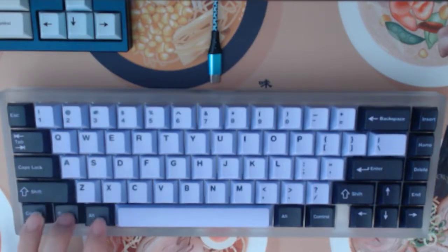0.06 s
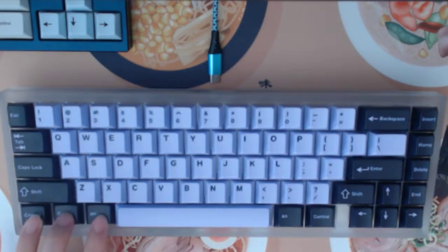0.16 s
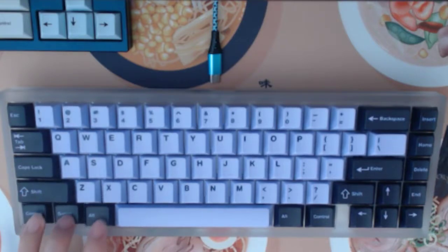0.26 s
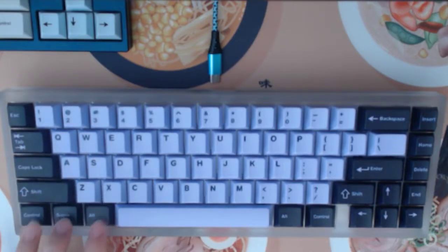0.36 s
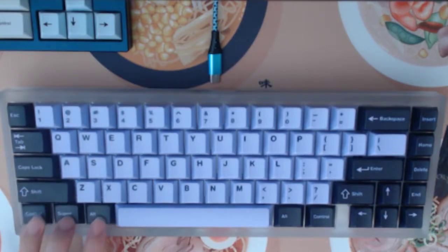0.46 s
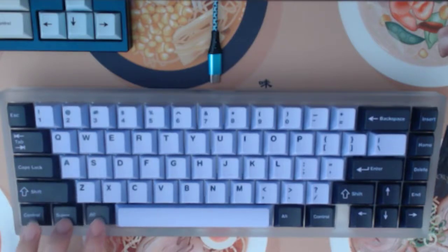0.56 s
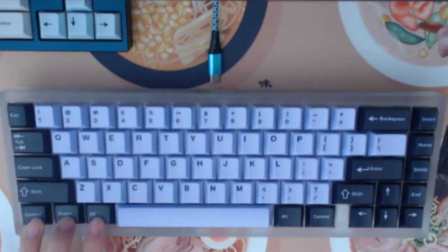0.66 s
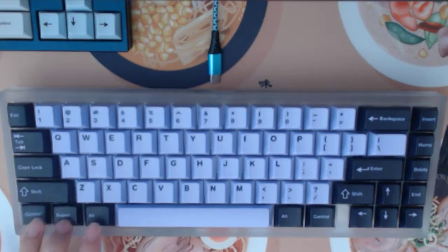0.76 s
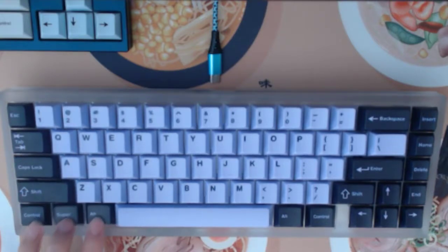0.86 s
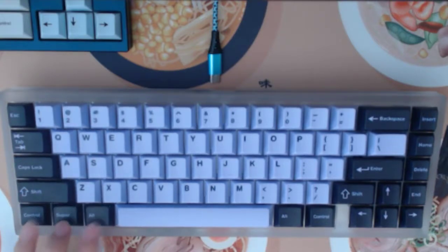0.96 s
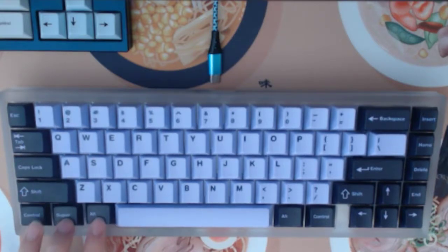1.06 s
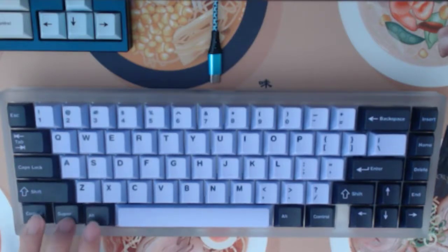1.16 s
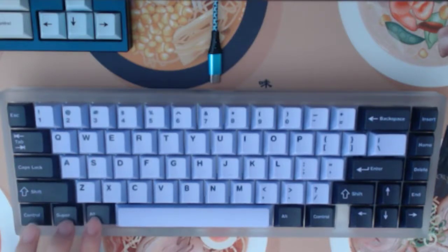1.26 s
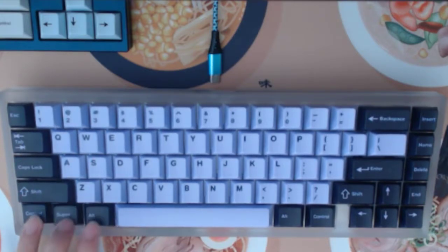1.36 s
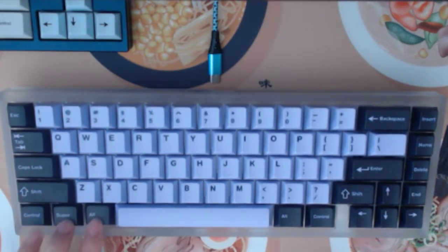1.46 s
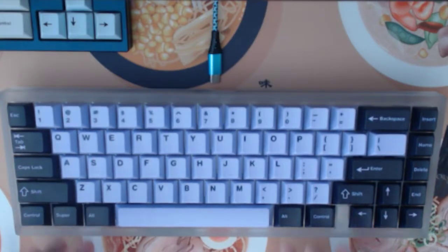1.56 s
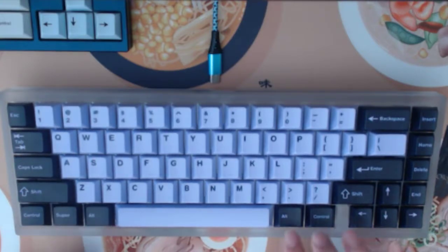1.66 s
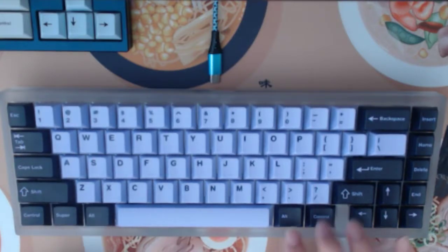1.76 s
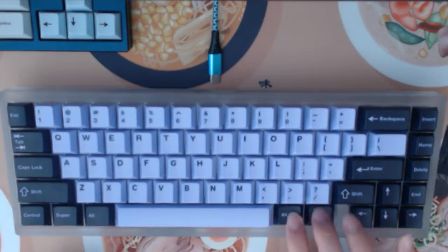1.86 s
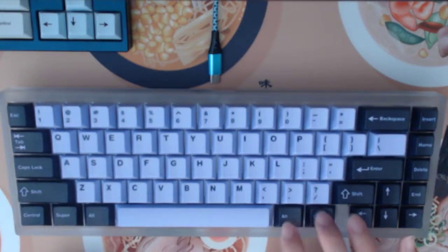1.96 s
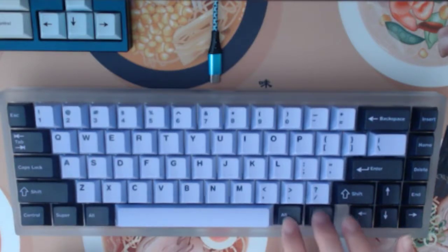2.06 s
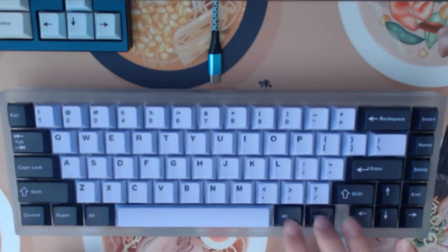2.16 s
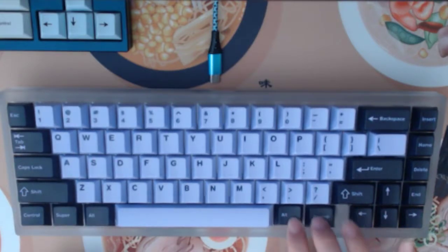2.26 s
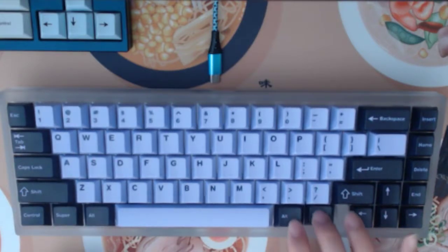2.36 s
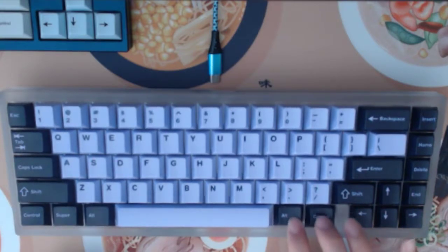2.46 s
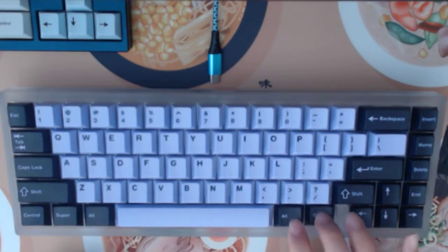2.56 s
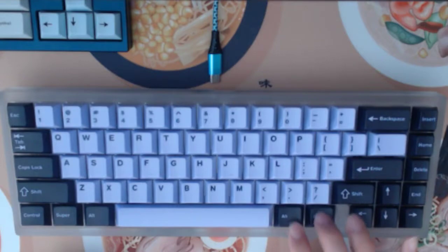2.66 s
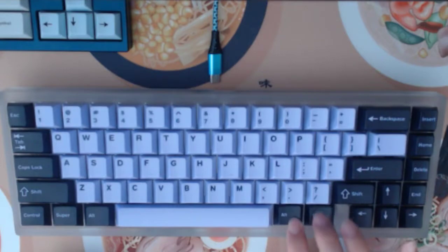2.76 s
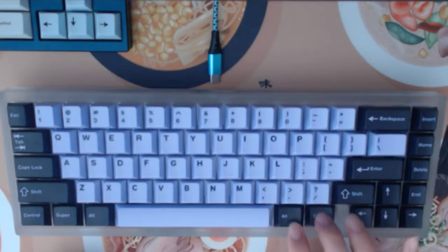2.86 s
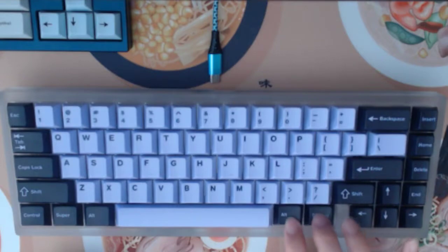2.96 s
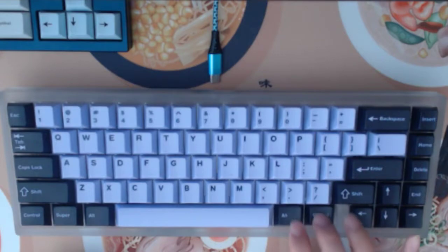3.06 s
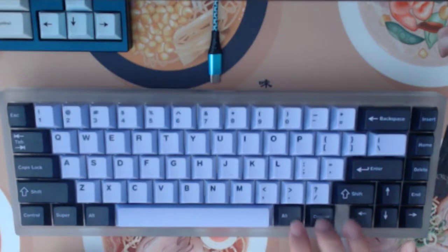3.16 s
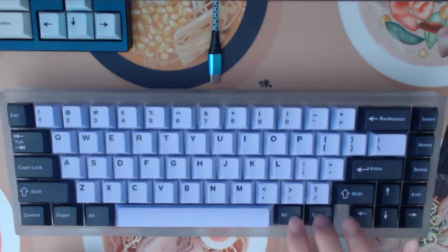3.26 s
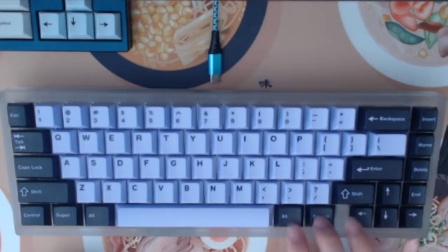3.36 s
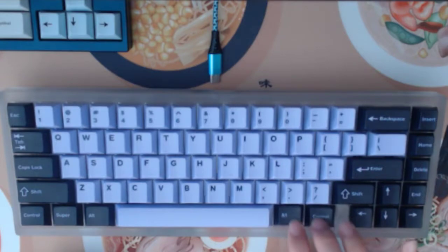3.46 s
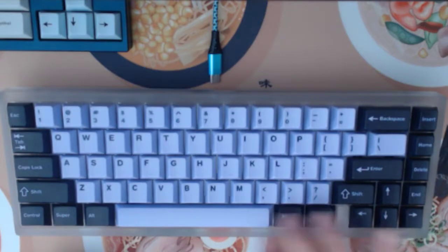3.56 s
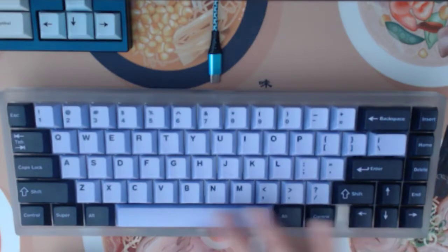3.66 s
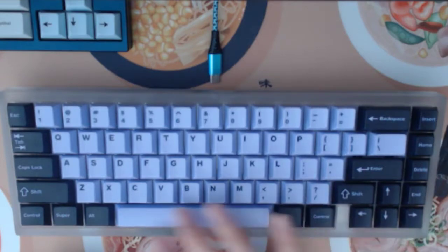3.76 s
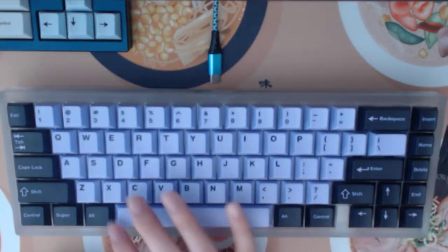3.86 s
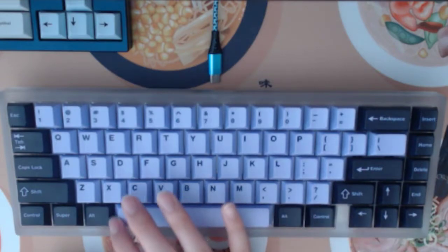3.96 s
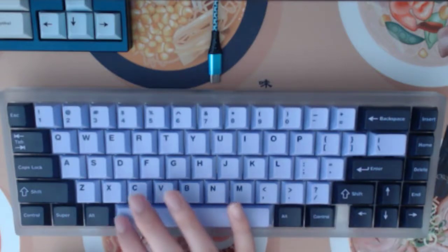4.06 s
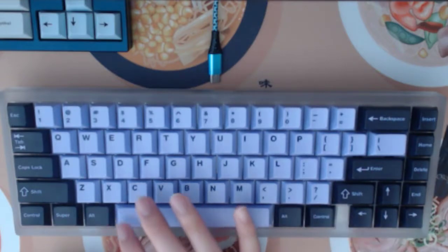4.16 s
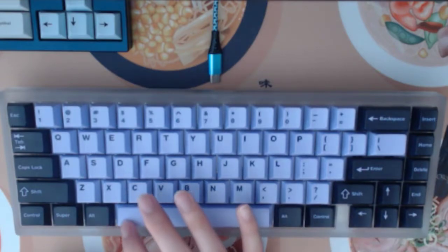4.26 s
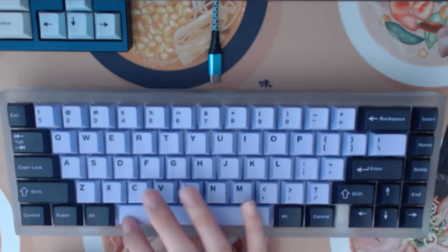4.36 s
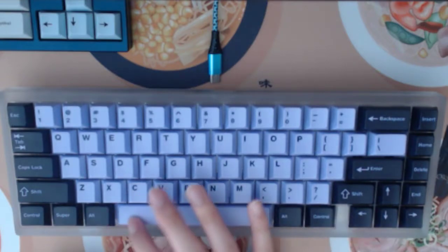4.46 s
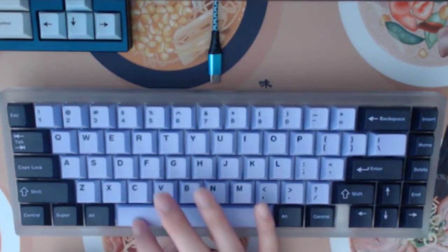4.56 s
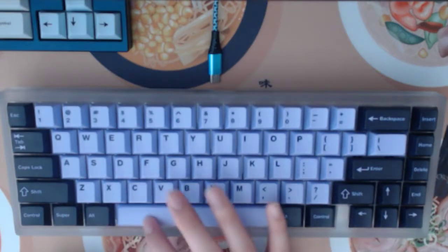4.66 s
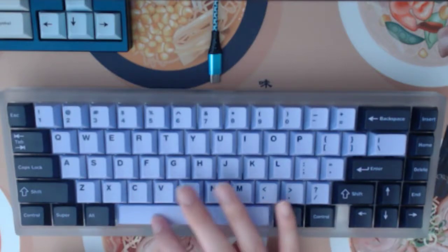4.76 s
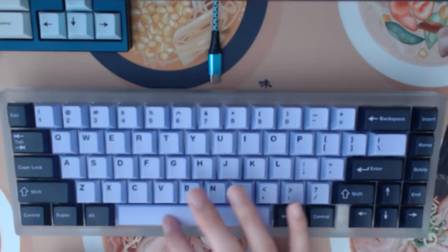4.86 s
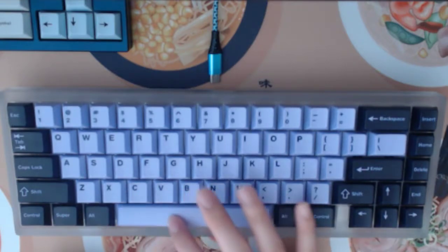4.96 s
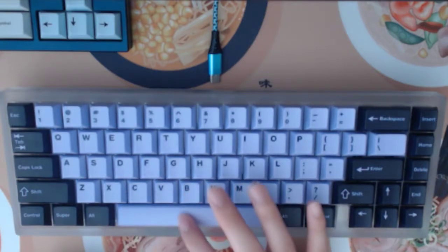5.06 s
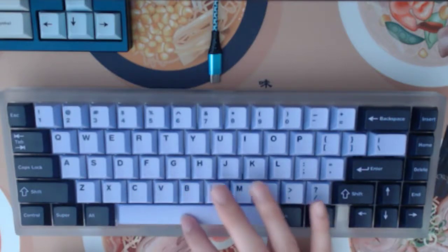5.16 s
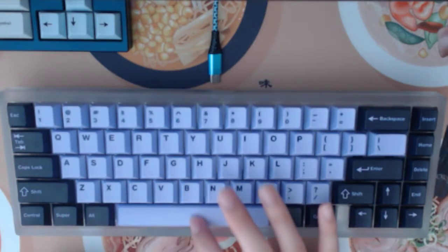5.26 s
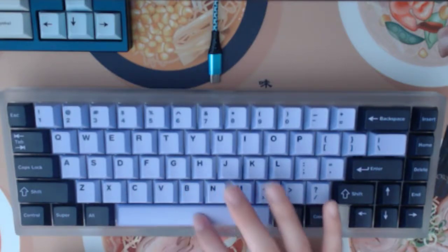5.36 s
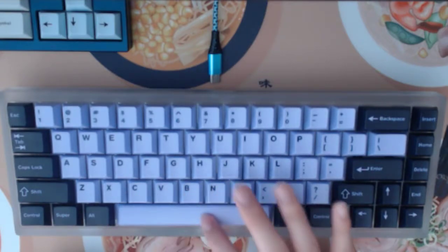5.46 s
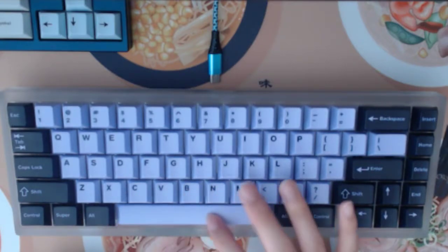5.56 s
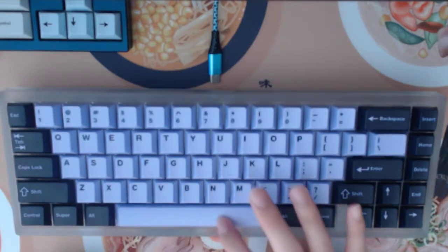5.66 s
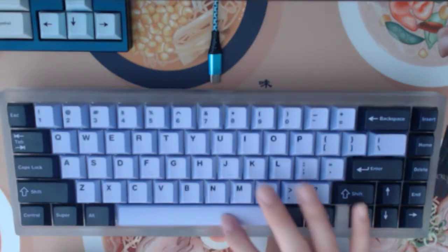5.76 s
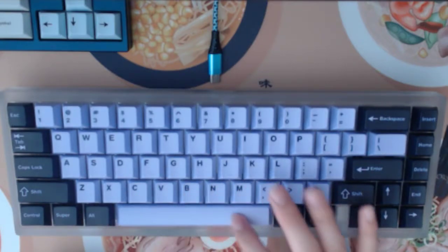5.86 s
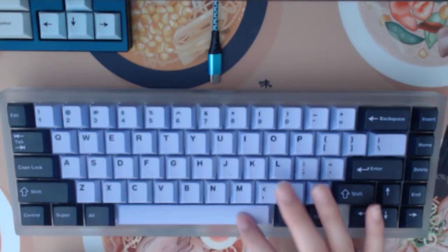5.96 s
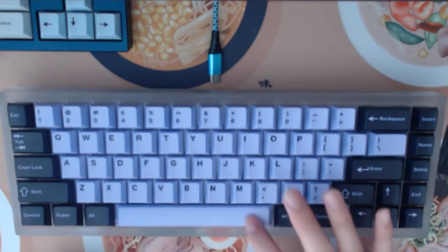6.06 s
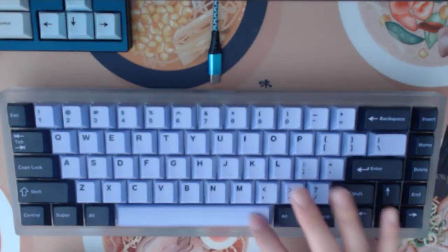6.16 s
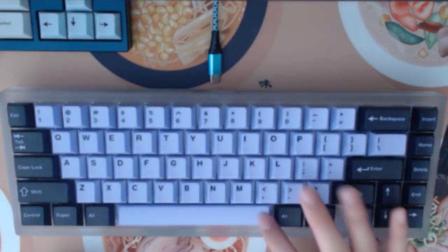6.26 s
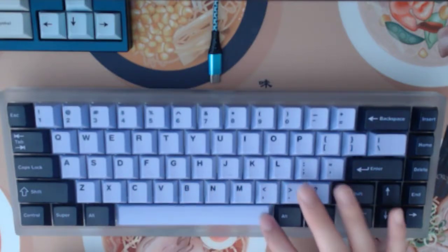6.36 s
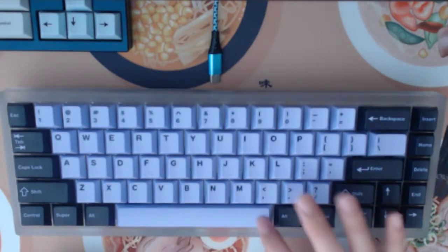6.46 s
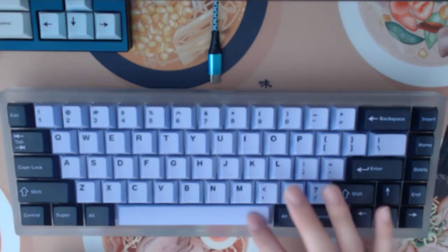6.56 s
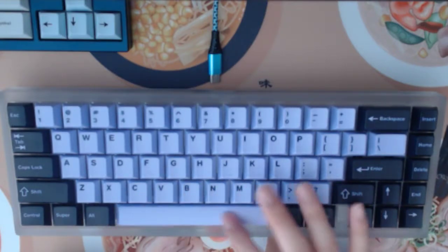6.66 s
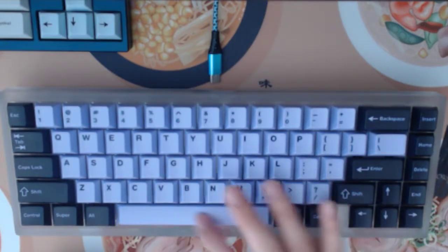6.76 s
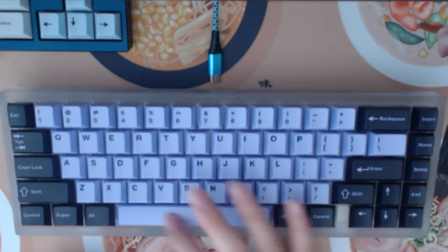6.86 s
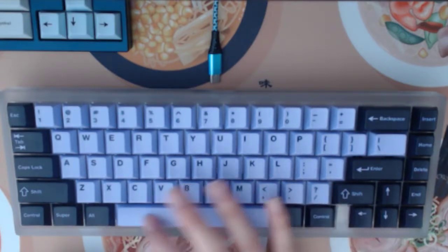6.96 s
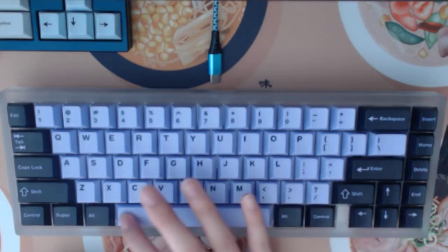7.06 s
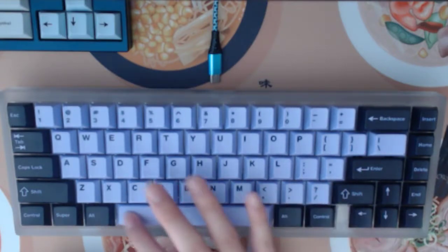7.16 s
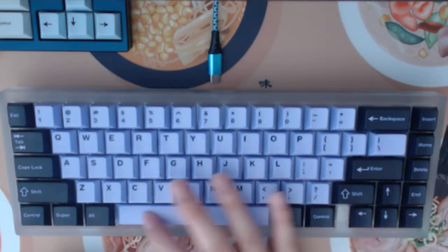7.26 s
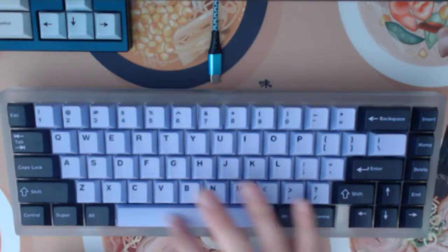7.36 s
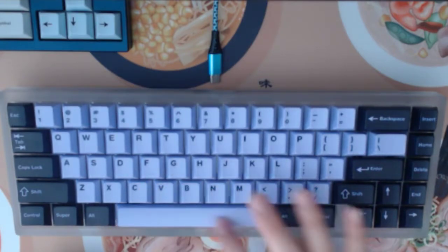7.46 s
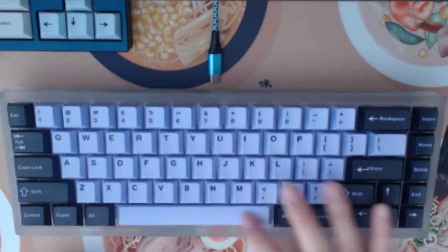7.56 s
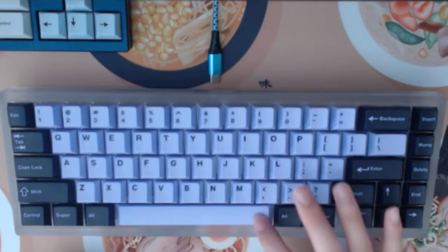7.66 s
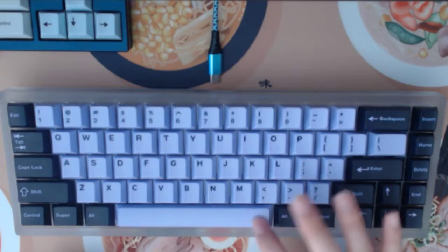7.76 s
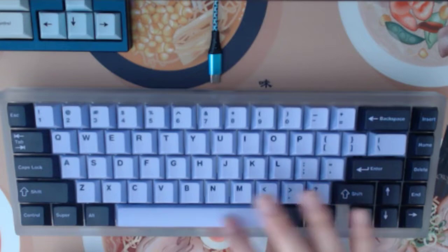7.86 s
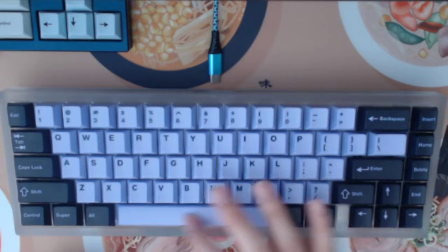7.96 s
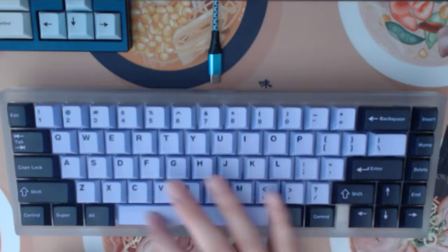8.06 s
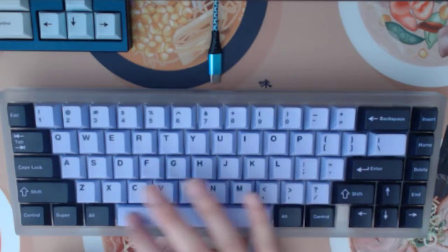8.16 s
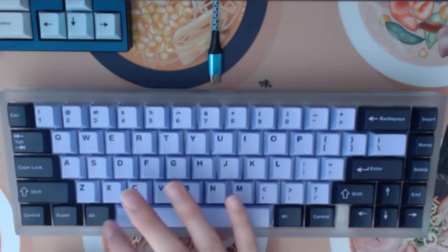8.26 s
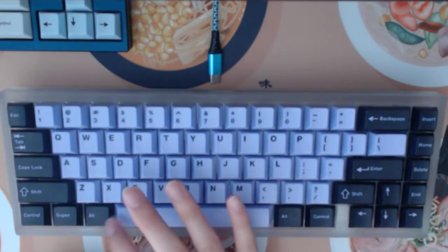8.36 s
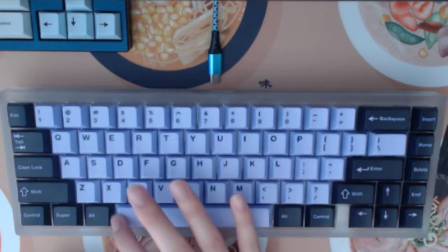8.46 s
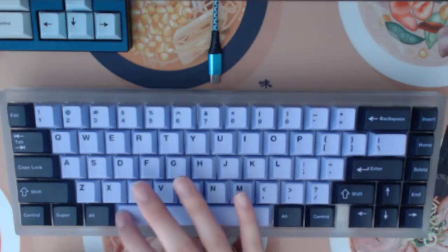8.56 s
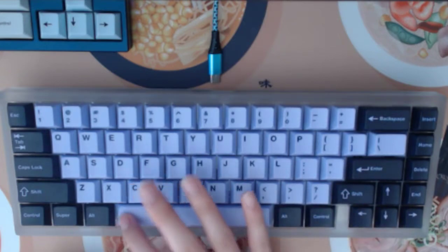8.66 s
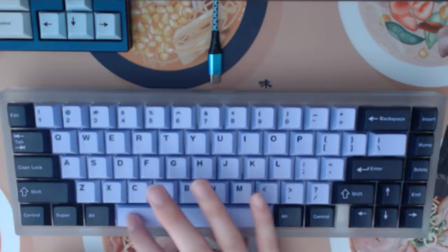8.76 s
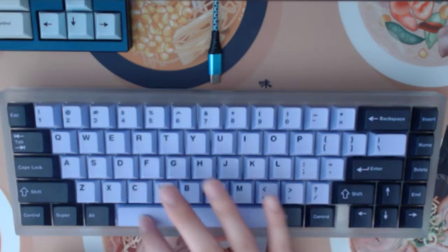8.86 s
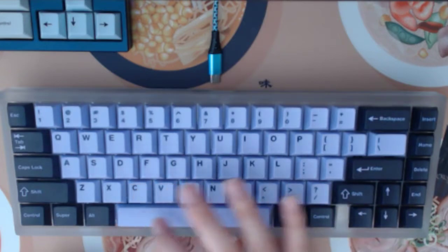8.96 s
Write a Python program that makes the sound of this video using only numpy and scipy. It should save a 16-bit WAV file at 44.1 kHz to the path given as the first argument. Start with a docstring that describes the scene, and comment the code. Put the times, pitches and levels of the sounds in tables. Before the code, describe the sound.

Close on a mechanical keyboard on a desk, small modifier keys are tapped in quick pairs, each a dry plastic clack with a softer release. After a faint finger brush and dull hand touch, fuller paired knocks follow. A short gap, then the space bar is struck steadily about seven times a second, rounder and woodier. Small room, short reflections, faint low hum.

```python
"""Fingers tap the bottom row of a mechanical keyboard on a desk, over a steady low hum of room air.
The ring of an earlier release opens it, then the small left keys come, mostly in quick pairs.
At about 1.5 s fingers brush the caps and the hand lands with dull puffs; then come the right keys, then the space bar.
Each press, release and light tick is a plastic knock: damped cap modes plus noise clatter, a thump
of desk modes, early wall echoes and a short noise tail for the room."""
import sys
import numpy as np
from scipy import signal
from scipy.fft import rfft, irfft, next_fast_len
from scipy.io import wavfile
from scipy.ndimage import uniform_filter1d

SR = 44100
rng = np.random.default_rng(int(sys.argv[2]) if len(sys.argv) > 2 else 0)


def elevation(decibels):
    """Turn decibel levels (scalar or array-like) into linear amplitude ratios."""
    levels = np.asarray(decibels, float)
    return 10 ** (levels / 20)


def to_wav(sig):
    """Store sig (one row per channel, or 1-D mono) as 16-bit WAV at the path in sys.argv[1].

    Samples outside -1..1 are clipped; the rate is SR.
    """
    pcm = np.clip(np.atleast_2d(sig), -1, 1) * 32767
    pcm = np.round(pcm).astype(np.int16)
    wavfile.write(sys.argv[1], SR, pcm.T)  # frames by channels


N = 397341

# Nominal ringing modes of each part of the row: pitch_hz, level_db (relative), t60_s
LEFT_MODES = [(908, -27, 0.017), (1320, 6, 0.011), (1665, 8, 0.0078), (2100, 8, 0.0087), (2603, 0.5, 0.017),
              (3173, 8.5, 0.0051), (4005, 6, 0.0076), (4830, -9.5, 0.0064), (5030, -10, 0.0086),
              (6330, -4.5, 0.004), (7390, -9.5, 0.014), (8620, -0.5, 0.0051), (10800, -5.5, 0.0067),
              (13000, -33, 0.0079)]
RIGHT_MODES = [(770, -13, 0.037), (1240, 10.5, 0.0099), (1860, 3, 0.0095), (2400, 7.5, 0.011),
               (2720, 6.5, 0.013), (3283, 7, 0.011), (3620, -0.5, 0.01), (4450, -3.5, 0.0027),
               (6600, -10.5, 0.0095), (7240, -10.5, 0.016), (8650, 1.5, 0.0041), (9420, -16, 0.014),
               (10600, -14, 0.0068), (13000, -28, 0.002)]
SPACE_MODES = [(646, -2.5, 0.025), (1083, 3, 0.013), (1450.2, -1.5, 0.0065), (1584, 2.5, 0.008),
               (1931, 1.5, 0.0084), (2500, 7, 0.0053), (2836, -3, 0.028), (3169, -8.5, 0.027),
               (3970, -8, 0.0058), (4660, -12.5, 0.011), (5094, -12.5, 0.013), (6270, -11, 0.0055),
               (6740, -17, 0.0077), (7420, -2.5, 0.0099), (8210, -1, 0.0084), (9140, 2.5, 0.0038),
               (10720, -5, 0.0077), (11300, -11.5, 0.02), (12870, 0, 0.0046)]
# When the hand moves to the next part of the row: start_s
HAND_MOVES = [1.6, 3.7]
# Edges of the case, cap, stem and tick ranges: edge_hz
RANGE_EDGES = [400, 1450, 4200, 7000, 16500]
# Nominal desk modes: pitch_hz, t60_s, then left_db, right_db, space_db (against the cap peak)
DESK_MODES = [(69.7, 0.28, -29, -42, -35.5), (101, 0.17, -30, -40.5, -32.5), (173, .22, -44.5, -38, -34.5),
              (160, 0.03, -56, -16, -34.5), (264.2, 0.29, -43.5, -47.5, -33.5),
              (361, 0.11, -41, -42, -38.5), (405, 0.028, -27, -46, -20)]
# Early wall echoes, before absorption: delay_s, level_db
WALL_ECHOES = [(.0068, -21), (.011, -22.5), (0.022, -24), (0.0254, -24), (.046, -36.5)]
# Decay of the room tail: frequency_hz, t60_s
ROOM_DECAY = [(300, 0.22), (1000, 0.43), (3000, 0.32), (8000, 0.37), (15000, 0.47)]
# Colour of the reflected sound: frequency_hz, level_db
ABSORPTION = [(400, -2.5), (1500, -1), (4000, -5.5), (9000, -10.5), (15000, -4)]
# Colour of the room air: frequency_hz, density_db (per Hz, relative)
AIR_COLOUR = [(15, -51), (25, -4), (70, -4.5), (108, 0), (146, -3.5), (177, -3), (304, -7), (389, -11),
              (445, -17.5), (1010, -25), (4860, -41.5), (14800, -49), (16500, -56)]
# Swell of each hand touch: level_db, t60_s
TOUCH_SWELLS = [(-44, .04), (-50, 0.06)]
# Unpitched clatter, rows case, cap, stem, tick: level_db (against the modes), t60_s
CLATTER = [(-12, 0.068), (-12, 0.003), (-4, 0.005), (-2.5, 0.011)]
# When a hand touches down on the desk: start_s
TOUCHDOWNS = [1.668, 1.684]
# Level path of fingers brushing over the caps: time_s, level_db
BRUSH_LEVEL = [(1.5, -71), (1.545, -62), (1.6, -64), (1.64, -74), (1.74, -87.5)]
# Keys hitting bottom: start_s, cap_peak_db, crispness_db (added to stem and tick)
KEY_PRESSES = [(0.0278, -17.5, 2), (0.0923, -17, -0.5), (0.2087, -15.5, 1.5), (0.2695, -18, -0.5),
               (0.3819, -14, 1), (0.4408, -17, 0), (0.562, -15.5, 1), (0.6222, -18.5, -2.5),
               (0.755, -15, 0.5), (0.8127, -17, 0), (0.9474, -17, 0), (1.0023, -16, 1), (1.1248, -13.5, 0),
               (1.1849, -16, 1.5), (1.3005, -13.5, 2), (1.3617, -15.5, -0.5), (1.7556, -13.5, -1),
               (1.8025, -16.5, -1.5), (1.9738, -12.5, 1.5), (2.0183, -14, -1), (2.146, -10.5, 0.5),
               (2.1892, -16, -1.5), (2.3261, -13, 1.5), (2.3723, -16, 0.5), (2.5077, -15, -1),
               (2.5327, -16, -1), (2.6709, -9, -3), (2.7042, -14.5, 0.5), (2.8567, -16, 2),
               (2.8799, -13.5, 0), (3.018, -13.5, 0.5), (3.0541, -14, -1), (3.1926, -16.5, 0.5),
               (3.2169, -16.5, -1.5), (3.3432, -19.5, -0.5), (3.3752, -13.5, 0), (3.8669, -25, 0.5),
               (4.1676, -11, -0.5), (4.3153, -14.5, 1), (4.4438, -11.5, 0.5), (4.5876, -13.5, 1),
               (4.7209, -14.5, 1), (4.8495, -16, 2.5), (4.9817, -15, 1), (5.1147, -12, -1),
               (5.257, -11, -1), (5.3914, -10.5, -0.5), (5.5343, -13.5, 0.5), (5.661, -15, 1),
               (5.7976, -13, -2), (5.926, -14, 0), (6.0581, -11.5, -0.5), (6.1965, -10.5, 0.5),
               (6.339, -10, 0), (6.4818, -14, -3), (6.6025, -14, -0.5), (6.7368, -15.5, -1.5),
               (6.85, -15, 1), (6.979, -15.5, 2), (7.0948, -12.5, 1.5), (7.2277, -13, 0), (7.3656, -10, -1),
               (7.5119, -13.5, -2), (7.633, -16.5, -3), (7.7499, -11, -0.5), (7.894, -13.5, 0),
               (8.0395, -17, 2.5), (8.1389, -12.5, 2), (8.3821, -16, -1), (8.51, -11, 2.5),
               (8.6512, -11.5, 3), (8.774, -10.5, 1.5)]
# Keys springing back to the top: start_s, cap_peak_db, crispness_db (added to stem and tick)
KEY_RELEASES = [(0.1418, -34, -3), (0.1644, -26, -4), (0.3396, -22.5, -1), (0.5219, -24, -1.5),
                (0.6845, -36, -6), (0.701, -25.5, -5.5), (0.854, -34, -4.5), (0.8942, -19.5, -4.5),
                (1.078, -22.5, -0.5), (1.2331, -32, -7), (1.2664, -23.5, -1), (1.4392, -36, -9),
                (1.4661, -31, -11), (1.8664, -23.5, -2), (1.9306, -24.5, -2.5), (2.054, -23, 3.5),
                (2.1124, -30, 2.5), (2.2378, -25.5, -2.5), (2.2753, -18, -1), (2.4078, -28.5, -8.5),
                (2.4538, -23, 2), (2.618, -21, -2.5), (2.7722, -36, 2), (2.803, -18.5, -0.5),
                (2.9427, -38.5, 1), (2.9757, -22, 3.5), (3.1043, -37.5, 2), (3.148, -27, 0.5),
                (3.295, -18, -0.5), (3.455, -19, 0.5), (3.9348, -28.5, 3), (4.2363, -21.5, 3.5),
                (4.3771, -22.5, 3), (4.5121, -22, -3), (4.6492, -21, 0), (4.793, -34, 5), (4.9146, -23, 0),
                (5.0474, -23, -0.5), (5.1845, -22.5, 2.5), (5.324, -25.5, 0.5), (5.4603, -25.5, -0.5),
                (5.5968, -22.5, 2), (5.7262, -31.5, -1.5), (5.8593, -27, 0), (5.99, -24.5, -2.5),
                (6.121, -24.5, -4), (6.2612, -21, 2), (6.4085, -29.5, 0.5), (6.542, -34.5, -3),
                (6.6666, -23.5, -1), (6.7984, -42, 0), (6.9075, -25.5, 1), (7.0424, -26.5, 1.5),
                (7.162, -24, 0.5), (7.2963, -19, 3), (7.438, -24.5, -0.5), (7.574, -32.5, -4),
                (7.6879, -30, -3), (7.8188, -21.5, 1), (7.9588, -22, 1.5), (8.096, -35.5, 1),
                (8.1954, -19, 4), (8.4348, -21.5, 0.5), (8.5787, -26, 0), (8.7207, -19.5, 4.5),
                (8.8421, -20.5, 3)]
# A fingertip landing on a cap or a cap rebounding: start_s, cap_peak_db
LIGHT_TICKS = [(.0356, -20.5), (0.3988, -28), (0.4601, -21), (.5899, -30), (0.773, -23), (0.8358, -30),
               (.9715, -29.5), (0.9972, -36.5), (1.022, -31.5), (1.144, -24), (1.174, -31), (1.2062, -29),
               (1.328, -24.5), (1.747, -31.5), (2.58, -40), (4.155, -30), (4.2922, -41), (4.427, -33),
               (4.569, -34), (4.701, -40.5), (5.519, -39), (5.7761, -39), (5.903, -34.5), (6.038, -39),
               (6.18, -37), (6.325, -38), (6.957, -42), (7.4905, -42), (8.3658, -29), (8.4943, -33.5),
               (8.636, -32)]
# One release before the start, still ringing in the room: start_s, cap_peak_db, crispness_db
EARLIER_RELEASE = (-0.045, -24, 0)
# Contact colour for left, right, space; rows press, release, tick, second finger's press (not for space):
# case_db, stem_db, tick_db (base levels against the cap), longest_mode_db (added to that mode)
CONTACT_COLOUR = [
    [(-21.5, -17, -8.5, -29.5), (-12.5, -3.5, -1.5, 9), (-14.5, -9, -5.5, 8), (-16, -9.5, -4, 0.5)],
    [(-31, -8.5, -3, 1.5), (-16.5, -7.5, -10, -1), (-14.5, -6.5, -2.5, 1), (-22.5, 0, 0, 12.5)],
    [(-17.5, -4.5, -5, -0.5), (-13.5, -8.5, -9, -2.5), (-13.5, -6, -4.5, -2)],
]
# Air under the left, right, space caps singing into the room: centre_hz, width_hz, boost_db
CAP_CAVITIES = [
    [(7330, 200, 5.5), (8550, 580, 10.5)],
    [(7400, 200, -0.5), (8550, 390, 3)],
    [(2840, 160, 0.5), (4950, 540, 2.5)],
]
# Lean toward higher cap modes for left, right, space, in the row order of CONTACT_COLOUR: tilt_db_per_octave
CONTACT_TILT = [(-3, -1.5, -3, 3), (0, 0, 0, 2), (0, 2.8, -2)]


def along(points, hz):
    """Reads (Hz, value) points on a log frequency axis."""
    point_hz, value = np.transpose(points)
    return np.interp(np.log(hz + 1), np.log(point_hz + 1), value)


def coloured(x, spectrum):
    """Filters x by a curve of (Hz, dB) points."""
    length = x.shape[-1]
    size = next_fast_len(length + 8192)
    gain = elevation(along(spectrum, np.fft.rfftfreq(size, 1 / SR)))
    return irfft(rfft(x, size) * gain, size)[..., :length]


def peak_one(x):
    """Scales x to a peak of one."""
    return x / np.abs(x).max()


def keys():
    """Every contact strikes plastic, excites the room and sends a thump into the desk."""
    out = np.zeros(N + 2 * SR)  # one spare second at either end
    t = np.arange(SR // 3) / SR
    rows = list(contacts())
    chance = rng.standard_normal((len(rows), 3, 20))
    grits = rng.standard_normal((len(rows), SR // 16))
    tails = room_tails(count=len(rows))
    desk_hz, desk_t60, *desk_db = np.transpose(DESK_MODES)
    for (start_s, side, cap_db, *colour), draw, grit, tail in zip(rows, chance, grits, tails):
        at = round((start_s + 1) * SR)
        modes = [LEFT_MODES, RIGHT_MODES, SPACE_MODES][side]
        direct = knock(modes, cap_db, *colour, draw[:2], grit)
        thump_db = cap_db + desk_db[side] + 1.5 * draw[2, :len(DESK_MODES)]
        thump = ringing(desk_hz, thump_db, desk_t60, t, attack_s=.007).sum(axis=0)
        wet = reflected(direct, tail, CAP_CAVITIES[side], blur_octaves=.3)
        for sound in (direct, wet, thump):
            out[at:at + len(sound)] += sound
    return out[SR:SR + N]


def contacts():
    """Gives each contact its place in the row and its balance of case, cap, stem and tick."""
    press, release, tick, second_finger = range(4)
    roll_s = .07  # a press this soon after another is the second finger on the neighbouring key
    case_lags, usual_db = 0.43, -18  # the case ignores this share of each dB around the usual blow
    gaps = np.diff([-1] + [row[0] for row in KEY_PRESSES])
    rows = [(*row, second_finger if gap < roll_s else press) for row, gap in zip(KEY_PRESSES, gaps)]
    rows += [(*row, release) for row in [EARLIER_RELEASE, *KEY_RELEASES]]
    rows += [(*row, 0, tick) for row in LIGHT_TICKS]
    for start_s, cap_db, crisp_db, kind in rows:
        side = np.searchsorted(HAND_MOVES, start_s)
        case_db, stem_db, tick_db, longest_db = CONTACT_COLOUR[side][kind]
        case_db = case_db - case_lags * (cap_db - usual_db)
        yield (start_s, side, cap_db, case_db, stem_db + crisp_db, tick_db + crisp_db,
               longest_db, CONTACT_TILT[side][kind])


def knock(modes, cap_db, case_db, stem_db, tick_db, longest_db, tilt_db, chance, grit):
    """One plastic contact: modes and clatter of each range together reach that range's peak level."""
    hz, db, t60 = np.transpose(modes)
    t = np.arange(len(grit)) / SR
    scatter, detune = chance[:, :len(hz)]
    db = db + .8 * scatter + longest_db * (t60 == t60.max())
    # a weak contact is no clean blow: the cap rattles in its guide for a few milliseconds
    loose = np.clip((-13.5 - cap_db) / 22, 0, 1)
    force = .1 * loose * grit[::-1] * elevation(-60 * t / .009)
    force[0] = 1
    # it also favours the higher cap modes
    octaves = np.log2(hz / 2600)
    db = db + (tilt_db + 9 * loose) * octaves * (np.abs(octaves) < .8)
    rings = ringing(hz * (1 + .005 * detune), db, t60, t, attack_s=.00008)
    mode_range = np.searchsorted(RANGE_EDGES, hz) - 1
    out = 0
    for k, level_db in enumerate(cap_db + np.array([case_db, 0, stem_db, tick_db])):
        clatter_db, clatter_t60 = CLATTER[k]
        band = signal.butter(2, RANGE_EDGES[k:k + 2], "bandpass", fs=SR, output="sos")
        clatter = peak_one(signal.sosfilt(band, grit * elevation(-60 * t / clatter_t60)))
        sound = peak_one(rings[mode_range == k].sum(axis=0)) + elevation(clatter_db) * clatter
        if k == 1:  # the first instant of contact snaps along with the cap's modes
            snap_hz, snap_db, snap_t60 = 2264, -6, 0.0035
            snap = np.sin(2 * np.pi * snap_hz * t) * elevation(-60 * t / snap_t60)
            sound = sound + elevation(snap_db) * peak_one(signal.sosfilt(band, snap))
        struck = signal.fftconvolve(sound, force)[:len(t)]
        out = out + elevation(level_db) * peak_one(struck)
    return out


def ringing(hz, db, t60, t, attack_s):
    """One damped sine per row; low modes start together, higher neighbours in opposite senses."""
    sense = np.where(hz < RANGE_EDGES[1], 1, (-1.) ** np.arange(len(hz)))
    sines = np.sin(2 * np.pi * hz[:, None] * t)
    decay = elevation(-60 * t / t60[:, None])
    return (sense * elevation(db))[:, None] * sines * decay * (1 - np.exp(-t / attack_s))


def reflected(direct, tail, cavity, blur_octaves):
    """Walls repeat the knock; the tail gathers sound sent in all directions, so its notches fill in."""
    walls = np.zeros(SR // 16)
    for delay_s, db in WALL_ECHOES:
        walls[round(delay_s * SR)] = elevation(db)
    early = signal.fftconvolve(direct, coloured(walls, ABSORPTION))
    # blur the knock's log spectrum along an octave axis
    hz = np.fft.rfftfreq(len(tail), 1 / SR)
    level = np.log(np.abs(rfft(direct, len(tail))) + 1e-9)
    octaves = np.log2(hz + 50)
    grid = np.arange(octaves[0], octaves[-1], .01)
    width = round(blur_octaves / .01)
    blurred = uniform_filter1d(uniform_filter1d(np.interp(grid, octaves, level), width), width)
    smooth = np.exp(np.interp(octaves, grid, blurred))
    sings_db = sum(db / (1 + ((hz - centre_hz) / width_hz) ** 2) for centre_hz, width_hz, db in cavity)
    wet = irfft(rfft(tail) * smooth * elevation(sings_db), len(tail))
    wet[:len(early)] += early
    return wet


def room_tails(count):
    """One fresh noise tail for each contact; each frequency dies at its own speed."""
    length = SR // 2
    hz, t, noise = signal.stft(rng.standard_normal((count, length)), SR, nperseg=256)
    decay = elevation(-60 * t / along(ROOM_DECAY, hz)[:, None])
    tail = signal.istft(noise * decay, SR, nperseg=256)[1][:, :length]
    tail *= 1 - np.exp(-np.arange(length) / SR / 0.00042)  # the tail builds up
    tail = tail * elevation(-5.5) / np.linalg.norm(tail, axis=1, keepdims=True)
    return coloured(tail, ABSORPTION)


def finger_brush():
    """The faint hiss of skin sliding on plastic: coloured noise riding a level path."""
    colour = [(1000, -2.5), (3000, 2.5), (7000, -3), (12000, 2), (16000, -12.0)]  # (Hz, dB)
    hiss = coloured(rng.standard_normal(N), colour)
    level_db = np.interp(np.arange(N) / SR, *np.transpose(BRUSH_LEVEL))
    return elevation(level_db) * hiss / hiss.std()


def hand_touchdowns():
    """Dull puffs as a hand touches down: low noise with a sharp rise and an exponential fall."""
    t = np.arange(N) / SR
    colour = [(250, -21), (600, 2), (1300, -7), (2200, -17), (5000, -46)]  # (Hz, dB)
    puff = coloured(rng.standard_normal(N), colour)
    shape = 0
    for start_s, (db, t60) in zip(TOUCHDOWNS, TOUCH_SWELLS):
        since = np.clip(t - start_s, 0, 1)
        shape = shape + elevation(db - 60 * since / t60) * (1 - np.exp(-since / .001))
    return shape * puff / puff.std()


def air():
    """Steady low room hum: noise with most of its weight in the bass."""
    noise = coloured(rng.standard_normal(N), AIR_COLOUR)
    return elevation(-55.5) * noise / noise.std()


def scene():
    """Keys and hand pass the microphone's treble roll-off; the room air lies under them."""
    roll_off = signal.butter(3, 10900, fs=SR, output="sos")  # corner in Hz
    played = keys() + finger_brush() + hand_touchdowns()
    return (signal.sosfilt(roll_off, played) + air())[None]


def top_cut(x):
    """Nothing passes above the cut-off."""
    return signal.sosfilt(signal.butter(12, 16820, fs=SR, output="sos"), x)


def record(dry):
    """Takes the scene as the finished mix."""
    return top_cut(dry)


dry = scene()
out = record(dry)
to_wav(out)
```